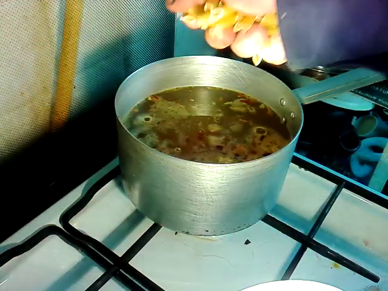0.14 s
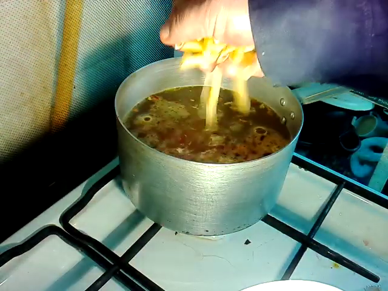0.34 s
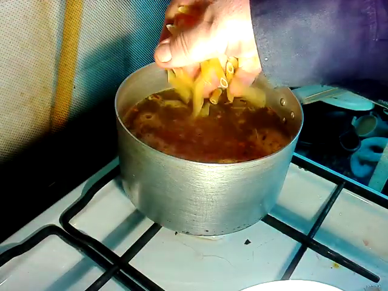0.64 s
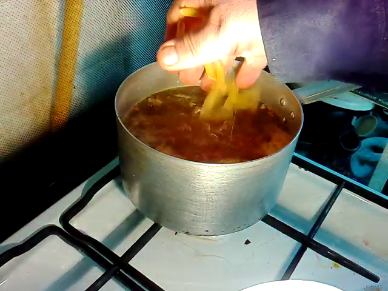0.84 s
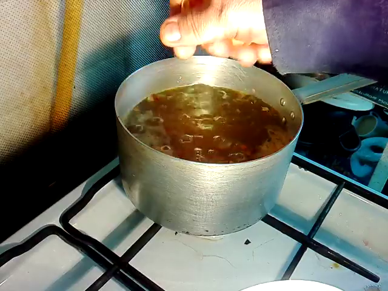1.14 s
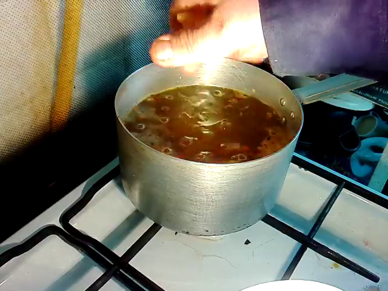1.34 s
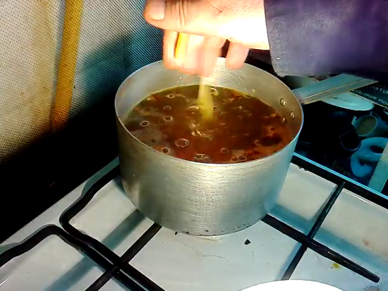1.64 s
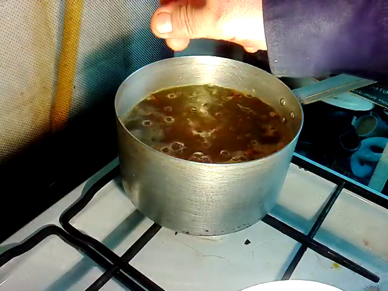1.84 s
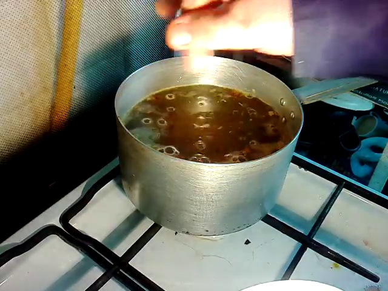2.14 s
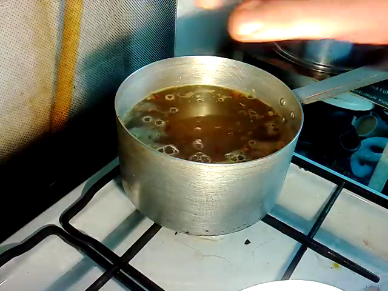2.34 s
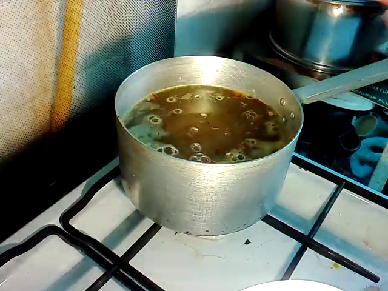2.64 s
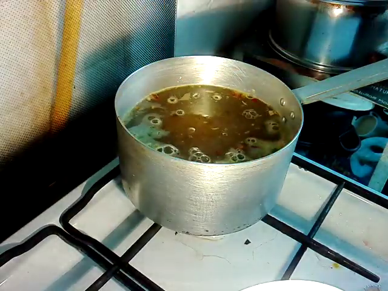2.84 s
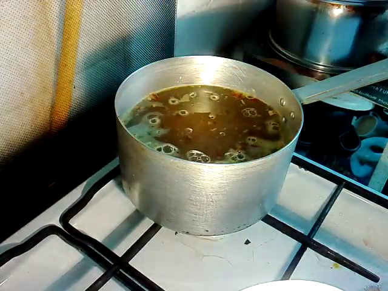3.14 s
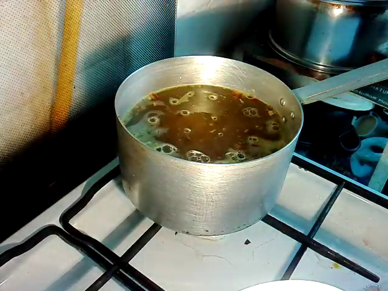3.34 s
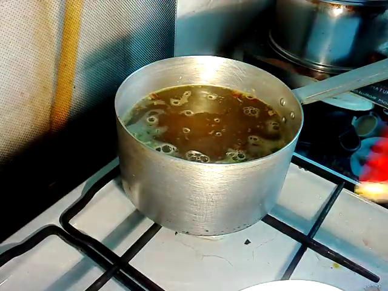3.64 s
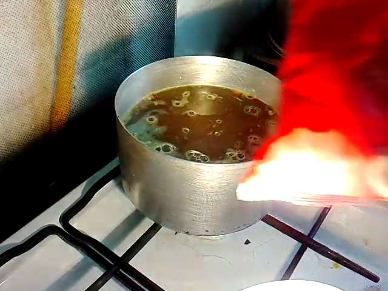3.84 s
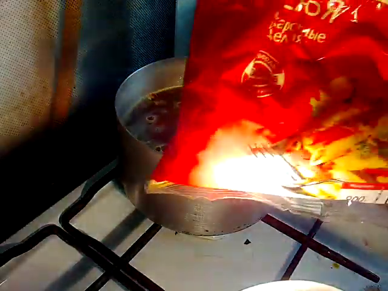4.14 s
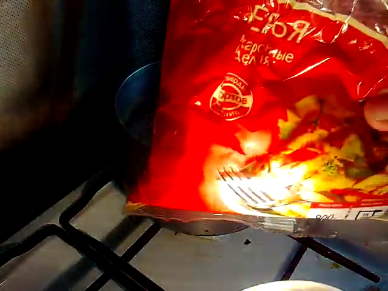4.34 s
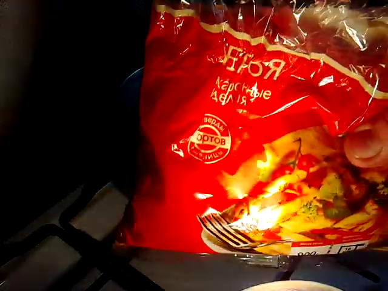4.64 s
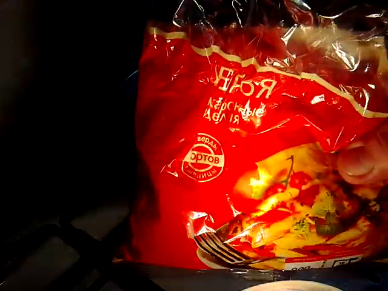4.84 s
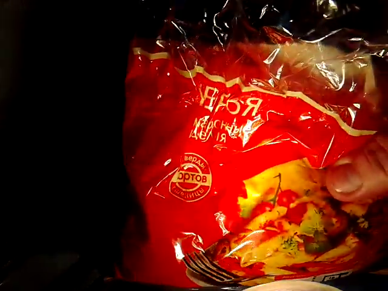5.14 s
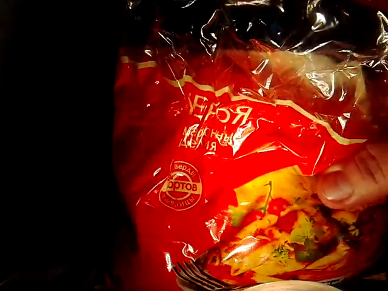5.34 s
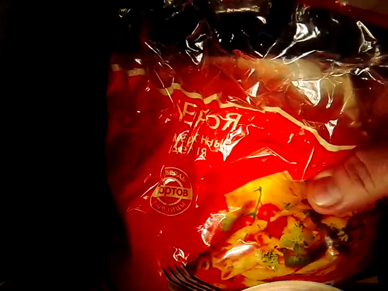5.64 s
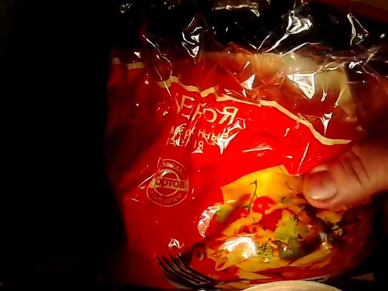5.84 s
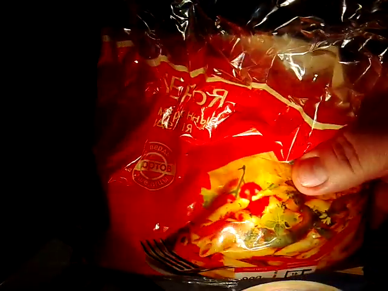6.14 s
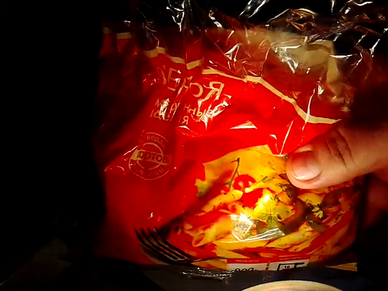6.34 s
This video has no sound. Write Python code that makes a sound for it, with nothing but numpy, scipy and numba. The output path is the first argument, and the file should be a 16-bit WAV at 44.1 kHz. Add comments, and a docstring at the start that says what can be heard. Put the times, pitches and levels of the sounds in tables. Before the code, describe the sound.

Dry pasta drops into a pot of broth with small plops and splashes, then a stiff plastic bag crinkles loudly.

```python
"""Dry pasta tubes drop from a hand into a pot of broth, close to the microphone in a small kitchen.
They clack together, then trap air that rings as ticks and plops while the broth gurgles and spatters.
Next a stiff plastic bag is grabbed: its folds snap over in a loud crackle, with a few late snaps
as it settles. The small recorder's microphone port dulls the top, and its expander lets the kitchen
hiss swell after loud sounds and sink again."""
import sys
import numpy as np
from scipy import signal
from scipy.fft import rfft, irfft
from scipy.io import wavfile
from scipy.ndimage import uniform_filter1d
from numba import njit

SR = 44100
rng = np.random.default_rng(int(sys.argv[2]) if len(sys.argv) > 2 else 0)


def unload_wav(signal):
    """Save mono or channel-first audio to the path in sys.argv[1] as 16-bit WAV at rate SR, clipped to [-1, 1]."""
    wavfile.write(
        sys.argv[1],
        SR,
        np.round(np.clip(np.atleast_2d(signal).T, -1, 1) * 32767).astype(np.int16),
    )


N = 286297


def from_db(db):
    """Decibels to gain."""
    return 10 ** (np.asarray(db) / 20)


def rms_one(x):
    """Scale to rms 1."""
    return x / np.sqrt(np.mean(x ** 2) + 1e-20)


def peak_one(x):
    """Scale to peak 1."""
    return x / np.abs(x).max()


def in_time(rows):
    """Level curves in dB, one value a sample; silent outside their span."""
    times, *columns = np.transpose(rows)
    return np.array([np.interp(np.arange(N) / SR, times, db, -120, -120) for db in columns])


def colour(x, points):
    """Shape by (Hz, dB) points, minimum phase so that nothing sounds early."""
    hz = np.maximum(np.arange(2049) * SR / 4096, 1)
    points_hz, points_db = np.transpose(points)
    gain_db = np.interp(np.log(hz), np.log(points_hz), points_db)
    cepstrum = irfft(gain_db * np.log(10) / 20)
    cepstrum[1:2048] *= 2
    cepstrum[2049:] = 0
    return signal.fftconvolve(x, irfft(np.exp(rfft(cepstrum))))[:len(x)]


def band(x, low_hz, high_hz):
    """Butterworth band-pass."""
    return signal.sosfilt(signal.butter(2, [low_hz, high_hz], "band", fs=SR, output="sos"), x)


def drift(rate_hz):
    """Slow random wander, rms 1."""
    r = np.exp(-2 * np.pi * rate_hz / SR)
    return rms_one(signal.lfilter([1], [1, -2 * r, r * r], rng.standard_normal(N + SR))[SR:])


def grains(per_s, spread_db):
    """Random clicks of very uneven size."""
    sizes = from_db(spread_db * np.minimum(rng.exponential(1, N), 4)) * rng.choice([-1, 1], N)
    return sizes * (rng.random(N) < per_s / SR)


def add(out, start_s, sound):
    """Mix a sound in at a time."""
    i = round(start_s * SR)
    out[i:i + len(sound)] += sound[:N - i]


# Hiss of the kitchen and the recorder: frequency_hz, gain_db
HISS_SPECTRUM = [(18, -31), (30, -9.5), (70, -14), (135, -4.5), (319, -6.5), (554, -6.5), (1000, -9),
                 (2000, -10), (2480, -10.5), (5500, -15.5), (8000, -24.5), (10800, -37.5), (15000, -36),
                 (16500, -58.5)]
# Narrow whines in the hiss: centre_hz, width_hz, level_db
WHINES = [(229, 29, -84), (534, 14, -88), (1620, 81, -85), (1925, 195, -81), (2020, 29, -82),
          (2830, 30, -88.5), (9200, 90, -101), (12000, 53, -109)]
# Faint low drone in the room: pitch_hz, level_db
DRONE_PARTIALS = [(140.0, -80.5), (209.9, -77.5), (339.1, -75.5), (376.8, -81), (409.1, -79.5),
                  (479.1, -76.5), (549.1, -76.5), (689.1, -79.5)]


def room_tone(hiss_db=-70, drone_end_s=0.48):
    """Even hiss with whining bands, and a wavering drone that dies away at the start."""
    t = np.arange(N) / SR
    out = from_db(hiss_db) * rms_one(colour(rng.standard_normal(N), HISS_SPECTRUM))
    for hz, width_hz, db in WHINES:
        out += from_db(db) * rms_one(band(rng.standard_normal(N), hz - width_hz / 2, hz + width_hz / 2))
    fade = np.clip((drone_end_s - t) / 0.09, 0, 1)
    for (hz, db), phase in zip(DRONE_PARTIALS, rng.random(len(DRONE_PARTIALS))):
        level = from_db(db + 3 * drift(9)) * np.sqrt(2) * fade
        out += level * np.sin(2 * np.pi * (hz * t + phase + 0.2 * drift(14)))
    return out


# Broad thud, middle and fizz of a snap: centre_hz, spread_octaves
SNAP_BANDS = [(820, 0.62), (2000, 0.98), (10500, 0.82)]


def snaps(rows, centre_octaves=0.39, middle_db=-2, step=4.86):
    """Each snap is one sharp step and a noise burst of a few ms, coloured by four spectral humps."""
    out, t = np.zeros(N), np.arange(1500) / SR
    hz = np.geomspace(100, 20000, 48)
    for start_s, peak_db, centre_hz, thud_db, fizz_db, t60_s in rows:
        humps = zip([(centre_hz, centre_octaves), *SNAP_BANDS], [0, thud_db, middle_db, fizz_db])
        height = sum(from_db(db) / hump_hz * np.exp(-0.5 * (np.log2(hz / hump_hz) / octaves) ** 2)
                     for (hump_hz, octaves), db in humps)
        spectrum = np.transpose([hz, 20 * np.log10(height + 1e-8)])
        burst = rng.standard_normal(len(t)) * from_db(-60 * t / t60_s)
        burst[0] += step
        add(out, start_s, from_db(peak_db) * peak_one(colour(burst, spectrum)))
    return out


# Pasta in the hand, above the pot: start_s, peak_db, centre_hz, thud_db, fizz_db, t60_s
CLACKS = [(0.1335, -38.5, 1780, -17, -35, 0.012), (0.3021, -50, 1700, -13, -24, 0.017),
          (0.359, -53, 4950, -5, -6, .01), (2.216, -45.5, 2200, 3, 12, 0.0098)]


def pasta_clacks():
    """Dry tubes knock together, each with a short hard snap."""
    return snaps(CLACKS)


# Droplets landing near the microphone: start_s, peak_db, centre_hz
DROPLETS = [(0.3687, -58, 7900), (0.5197, -61, 8000), (0.5667, -49, 10000), (0.595, -50, 10500),
            (0.609, -52, 7800), (0.631, -46, 7500), (0.6532, -41, 10500), (0.6799, -46, 10000),
            (0.7198, -42, 11500), (0.74, -52, 7000), (0.7647, -50, 7200), (0.8031, -34, 8600),
            (0.851, -35, 11000), (0.858, -44, 7500), (0.9118, -48, 7500), (1.5444, -64, 8000),
            (1.5554, -54, 10000), (1.5953, -62, 9000), (1.7085, -46, 9450), (1.8622, -55, 8400)]


def droplets(t60_s=0.007, edge_ratio=1.44):
    """A droplet lands with a bare bright crack and no ring."""
    out, t = np.zeros(N), np.arange(800) / SR
    for start_s, db, hz in DROPLETS:
        splat = rng.standard_normal(len(t)) * from_db(-60 * t / t60_s)
        splat[0] += 4   # the impact
        add(out, start_s, from_db(db) * peak_one(band(splat, hz / edge_ratio, hz * edge_ratio)))
    return out


def swarm(clicks, low_hz, high_hz, cycles, count=16):
    """Many small bubbles: clicks are dealt to resonators that fall 60 dB in the given cycles."""
    dealt, out = rng.integers(0, count, N), 0
    for k, hz in enumerate(np.geomspace(low_hz, high_hz, count)):
        r, w = from_db(-60 * hz / (cycles * SR)), 2 * np.pi * hz / SR
        kicks = clicks * (dealt == k) + 1e-18
        out = out + signal.lfilter([0, np.sin(w)], [1, -2 * r * np.cos(w), r * r], kicks)
    return rms_one(out)


# Churn in the pot, one list for each of two handfuls: time_s, gurgle_db, spray_db
CHURN = [
    [(.4, -73, -79), (.57, -70.5, -61.5), (.79, -62.5, -63), (.82, -61, -50), (.96, -58, -55),
     (1.0, -82, -66), (1.1, -63.5, -78), (1.2, -85, -86)],
    [(1.53, -86, -83), (1.56, -69.5, -75), (1.69, -76, -93), (1.72, -73, -60), (1.8, -83.5, -67),
     (1.9, -68.5, -90), (2.05, -102, -77.5)],
]
# Tone of the spray off the surface: frequency_hz, gain_db
SPRAY_COLOUR = [(900, -33.5), (1800, -9.5), (3000, -7), (4200, -6), (6000, -2), (9000, -7.5), (16000, 17.5)]


def churned_broth():
    """Countless small bubbles gurgle; droplets and tiny bubbles make a bright spray."""
    gurgle_db, spray_db = np.max([in_time(handful) for handful in CHURN], axis=0)
    gurgle = swarm(grains(1200, spread_db=3.5), 564, 1334, cycles=26)
    spray = swarm(grains(4000, spread_db=3.5), 1620, 14000, cycles=28)
    return from_db(gurgle_db) * gurgle + from_db(spray_db) * rms_one(colour(spray, SPRAY_COLOUR))


def bubble(hz, t60_s, rise, attack_s=0.0019, shake_rad=0.5):
    """A dying sine that climbs by 2 * rise * hz over t60_s as the air nears the surface; peak 1."""
    t = np.arange(round(0.2 * SR)) / SR
    shake = rms_one(band(rng.standard_normal(len(t)), 22, 0.34 * hz))   # from the churned surface
    cycles = hz * (t - rise * t / 6 + rise * t ** 2 / t60_s)
    envelope = from_db(-60 * t / t60_s) * (1 - np.exp(-t / attack_s))
    return peak_one(envelope * np.sin(2 * np.pi * cycles + shake_rad * shake))


# Tubes meeting the broth, close up: start_s, peak_db, pitch_hz, crack_over_ring_db
TICKS = [(0.4276, -61, 3100, 8.5), (0.4444, -55.5, 2950, -8), (0.514, -56, 4050, -13),
         (0.5596, -56, 5550, 2), (0.5638, -52, 3130, 3), (0.611, -49.5, 3760, 1), (0.654, -56, 2200, 7),
         (0.673, -51, 4660, -4), (0.6987, -47, 4120, -7), (0.7394, -55, 5260, -6), (0.7645, -52, 2220, 8),
         (0.804, -37, 3970, 6.5), (0.8088, -37.5, 4670, 4), (0.847, -52, 3640, 0), (0.86, -42, 3020, 6),
         (0.9148, -36.5, 2910, -12), (0.9458, -45, 5850, -16), (1.545, -58, 4000, 9),
         (1.5566, -51.5, 3970, 0), (1.5664, -57.5, 5300, 0), (1.595, -56.5, 2180, 9),
         (1.7097, -35, 3920, -6.5), (1.725, -59, 4080, 10), (1.862, -49.5, 4230, -0.5),
         (1.8737, -54, 2100, -2)]


def entry_ticks(crack_t60_s=0.015):
    """A tube cuts the surface with a crack and traps a tiny bubble that rings high and short."""
    out, t = np.zeros(N), np.arange(800) / SR
    bursts = rng.standard_normal((len(TICKS), len(t))) * from_db(-60 * t / crack_t60_s)
    for burst, (start_s, db, hz, crack_db) in zip(bursts, TICKS):
        ring = bubble(hz, t60_s=0.019, rise=0.21, attack_s=0.00019, shake_rad=0.31)
        add(out, start_s, from_db(db) * ring)
        add(out, start_s, from_db(db + crack_db) * peak_one(band(burst, 2130, 10200)))
    return out


# Hollow plops down in the pot: start_s, peak_db, pitch_hz
PLOPS = [(0.436, -59, 1200), (0.447, -61, 617), (0.471, -58, 910), (0.513, -55.5, 887), (0.534, -59, 644),
         (0.565, -54, 1210), (0.573, -48, 1066), (0.592, -52, 1257), (0.662, -51.5, 630), (0.706, -53, 880),
         (0.761, -52.5, 896), (0.778, -57, 1004), (0.812, -42, 908), (0.83, -49, 876), (0.849, -44.5, 1092),
         (0.864, -44, 890), (0.885, -48, 980), (0.912, -50, 536), (0.929, -46, 875), (0.954, -51, 1136),
         (0.988, -51.5, 953), (1.018, -54, 1100), (1.08, -48, 1056), (1.546, -49.5, 923), (1.569, -57, 679),
         (1.594, -52.5, 994), (1.708, -49.5, 1470), (1.731, -56, 1484), (1.863, -56, 520),
         (1.899, -60.5, 534), (1.966, -59.5, 887), (2.162, -62, 676)]
# Blips at the surface: start_s, peak_db, pitch_hz, rise_ratio
BLIPS = [(1.117, -54, 1440, 0.78), (1.862, -56, 1443, 1.3), (1.874, -56, 634, .7)]


def air_pockets():
    """Pockets closed by a sinking tube plop; those that burst at the surface blip swiftly upward."""
    out = np.zeros(N)
    for start_s, db, hz in PLOPS:
        t60_s = 0.052 * (1000 / hz) ** 0.97   # low pockets ring longer
        add(out, start_s, from_db(db) * bubble(hz, t60_s, rise=0.084))
    for start_s, db, hz, rise in BLIPS:
        add(out, start_s, from_db(db) * bubble(hz, t60_s=0.0604, rise=rise))
    return out


# Folds of the bag, near the microphone: start_s, peak_db, centre_hz, thud_db, fizz_db, t60_s
FOLD_SNAPS = [(2.5181, -52, 3360, -5, -1, 0.012), (2.5894, -42, 1380, -9, 0, 0.012),
              (2.6262, -43.5, 2400.0, -17, -10, 0.011), (2.6575, -39.5, 2300, -14, -4, 0.0086),
              (2.6798, -47, 1200.0, 7, -7, 0.012), (2.7216, -36.5, 1890, -14.0, -3, 0.019),
              (2.7265, -33.5, 2690.0, -11, -1, 0.011), (2.7399, -27.5, 2900, -2, -14, 0.0052),
              (2.7733, -36, 2690.0, 3, -4, 0.0091), (2.7975, -41.0, 4800.0, 8, 4, 0.012),
              (2.836, -26, 3020.0, -4, 4.5, 0.011), (2.8508, -33, 4800.0, -6, 8, 0.0071),
              (2.8597, -16, 3700, -6.5, -2.5, 0.015), (2.8645, -29.5, 3060, -5, -3, 0.016),
              (2.8918, -39, 1700.0, 12, 0, 0.0096), (2.9167, -41, 1200.0, 17, -2.0, 0.013),
              (2.9286, -32.5, 1370, -4, -8, 0.011), (2.9513, -26.0, 3020.0, 3.5, -16, 0.015),
              (2.9584, -32, 2690.0, 5, -9.0, 0.012), (2.9712, -27.5, 2690.0, -6, -15, 0.0084),
              (2.9779, -31, 4800.0, 6, -4, 0.013), (2.9853, -33, 2690.0, -2, -2.0, 0.01),
              (3.0227, -12, 2170, -6, 9, 0.0034), (3.0326, -29, 1200.0, 8, 7, 0.013),
              (3.0745, -27.5, 4800.0, -9, 4, 0.011), (3.0854, -27, 2140.0, -4, -10, 0.009),
              (3.0915, -20, 4800.0, -21.0, -3.5, 0.0028), (3.1055, -40, 3810.0, -6.0, -4.0, 0.0093),
              (3.1142, -19, 2980, -21, -14, 0.01), (3.1189, -22.0, 2370, -11, -14, 0.007),
              (3.1333, -27, 3810.0, 1, 1, 0.013), (3.1438, -9.5, 4800.0, -9.0, 12.5, 0.0054),
              (3.1493, -28.5, 1510.0, -4, -9, 0.0096), (3.1632, -25, 2400.0, 1, -14, 0.0108),
              (3.2025, -24.0, 4800.0, -6, 1, 0.013), (3.2099, -24.5, 4800.0, -7, -5, 0.012),
              (3.2156, -20.5, 1360, -8, 1, 0.0085), (3.2247, -28.0, 1510.0, 1, -16, 0.0095),
              (3.2334, -27.0, 3810.0, -4, -3.0, 0.0102), (3.2535, -17, 1200.0, -9, 0, 0.006),
              (3.2633, -18.5, 1350.0, -4, -10.0, 0.01), (3.2877, -17.5, 1370, -6, 0.0, 0.0053),
              (3.3118, -29.5, 1510.0, -4, -3.0, 0.013), (3.3196, -23, 4800.0, -9, -4, 0.0096),
              (3.336, -42, 3020.0, -8.0, -1.0, 0.0108), (3.3436, -24.5, 4800.0, -13, -2, 0.0066),
              (3.3647, -25, 2100, -10.0, -1, 0.019), (3.3848, -27.5, 1520, 14, -10.0, 0.011),
              (3.3916, -25, 2140.0, -10, -10, 0.018), (3.3961, -21.5, 4800.0, -9, 1.5, 0.009),
              (3.4019, -20.5, 4800.0, 1, 10, 0.014), (3.4096, -29.5, 4280.0, 10, -1.0, 0.0077),
              (3.4302, -20.5, 4770, -11.0, 3, 0.01), (3.4366, -33, 1700.0, -8, 2, 0.011),
              (3.4677, -34, 4800.0, -11.0, 6, 0.018), (3.4734, -25.5, 2410, 1, 2, 0.017),
              (3.4774, -25.0, 3060, -15, -4.0, 0.012), (3.5158, -28, 3100, -3, -2, 0.0072),
              (3.5248, -32, 1710, -5, -2.0, 0.0114), (3.5495, -25, 1900.0, -10.0, 1, 0.012),
              (3.5563, -32, 1510.0, 0.0, -4, 0.014), (3.565, -22, 4800.0, -8.5, -9, 0.0069),
              (3.5854, -37.5, 3000, -7, -3, 0.012), (3.6054, -22, 2070, -6.0, -4, 0.012),
              (3.6107, -31.0, 2690.0, -4, 2, 0.018), (3.6382, -31.5, 3810.0, -19, -9, 0.0102),
              (3.67, -29, 4230, -21.0, 10, 0.013), (3.687, -35, 1200.0, 3.0, -9.0, 0.014),
              (3.7768, -40, 3810.0, -14, 12, 0.013), (3.8321, -45.0, 2690.0, -4, -6, 0.0099),
              (3.8624, -31.5, 4800.0, -3, 15, 0.009), (3.8885, -42.5, 2140.0, -10, -3, 0.0078),
              (4.4702, -41.5, 1360, -10, -4, 0.0075), (4.6268, -36, 4280.0, -7, 6.5, 0.0096),
              (4.7, -41.5, 4800.0, -3, 5, 0.014), (4.8198, -53.5, 1200.0, 12, -8.0, 0.012),
              (4.8288, -38.5, 4200, 4, 2, 0.019), (5.4454, -60, 1210, 4.0, -8, 0.012),
              (5.782, -51.5, 3390.0, 7, -1, 0.012), (5.9854, -51.0, 3350, -11, 4, 0.014),
              (6.104, -63, 1510.0, 6, -4.0, 0.012)]
# The hand working the bag: time_s, crackle_db
GRIP = [(2.55, -68), (2.7, -61), (2.75, -49), (2.82, -49), (2.88, -42.5), (2.94, -44.5), (3.0, -47),
        (3.06, -47.5), (3.13, -42.5), (3.19, -42), (3.27, -36.5), (3.33, -40.5), (3.4, -36.5), (3.45, -42),
        (3.49, -37), (3.6, -44), (3.7, -49.5), (3.76, -70), (3.95, -81)]
# Crackle of the plastic film: frequency_hz, gain_db
FILM_SPECTRUM = [(40, -31.5), (100, -14), (200, -16.5), (420, -1.5), (500, -10.5), (1280, 2.5), (2470, -8),
                 (5000, -0.5), (7750, -17), (16000, -7.5)]


def plastic_bag():
    """Folds snap over, their size setting the pitch; between them the film crackles in clumps."""
    crackle_db, = in_time(GRIP)
    thud_db = 7 + 2.5 * drift(11)
    fizz_db = -4 + 2.5 * drift(9.9)
    clicks_per_s = 2500 * from_db(6 * drift(30))
    film = rms_one(colour(grains(clicks_per_s, spread_db=4.5), FILM_SPECTRUM))
    thud = from_db(thud_db) * band(film, 30, 800)
    fizz = from_db(fizz_db) * band(film, 4000, 11000)
    return snaps(FOLD_SNAPS) + from_db(crackle_db) * (thud + band(film, 800, 4000) + fizz)


def kitchen_reflections(x, t60_s=0.19, level_db=-13):
    """Hard walls close by return a dull, quickly dying tail after a 3 ms gap."""
    t = np.arange(round(0.5 * SR)) / SR
    tail = rng.standard_normal(len(t)) * from_db(-60 * t / t60_s) * (t > 0.003)
    tail = band(tail, 160, 6300)
    return from_db(level_db) * signal.fftconvolve(x, tail / np.sqrt(np.sum(tail ** 2)))[:N]


# Response of the small recorder's microphone: frequency_hz, gain_db
MIC_RESPONSE = [(20, 1.5), (7500, 2.5), (9000, -2), (11000, -19.5), (15000, -23.5), (20000, -41)]


def microphone_port(x):
    """The port loses treble above about 8 kHz."""
    return colour(x, MIC_RESPONSE)


@njit
def held_power(x, keep, ceiling):
    """Running mean of the power that cannot rise past a ceiling."""
    out, power = np.zeros(len(x)), 0.
    for i in range(len(x)):
        power = min(keep * power + (1 - keep) * x[i] ** 2, ceiling)
        out[i] = power
    return out


def expander(loud, threshold_db=-62, range_db=11.5, memory_s=0.45):
    """Gain for the background: it follows the loud sounds' mean power between a floor and a ceiling."""
    power = held_power(loud, np.exp(-1 / (memory_s * SR)), from_db(threshold_db + range_db) ** 2)
    gain = np.maximum(np.sqrt(power) / from_db(threshold_db), 1)
    return uniform_filter1d(gain, size=3000)


def scene():
    """Pot and bag close to one microphone in the kitchen, with the room tone swelling behind them."""
    close = pasta_clacks() + entry_ticks() + air_pockets() + droplets() + churned_broth() + plastic_bag()
    at_mic = microphone_port(close + kitchen_reflections(close))
    background = room_tone() - 0.00047   # the converter's offset
    return (at_mic + expander(at_mic) * background)[None]


def record(dry):
    """The recorder cuts the top steeply: 70 dB down from 16.5 kHz."""
    return signal.sosfilt(signal.cheby2(12, 70, 16500, fs=SR, output="sos"), dry)


dry = scene()
out = record(dry)
unload_wav(out)
```